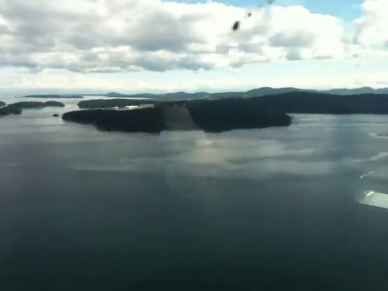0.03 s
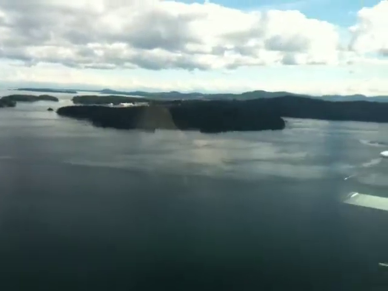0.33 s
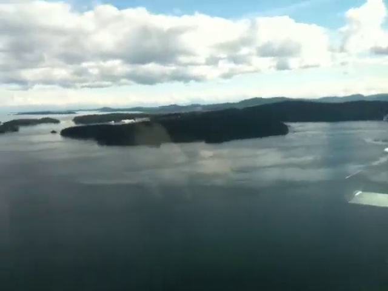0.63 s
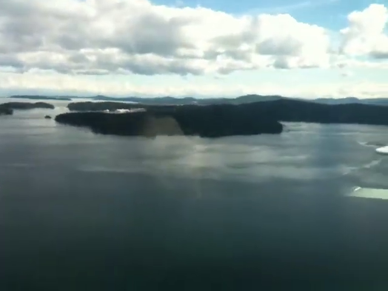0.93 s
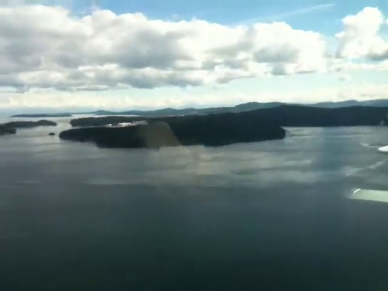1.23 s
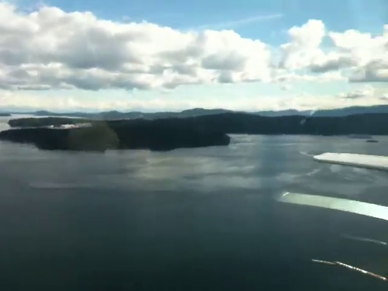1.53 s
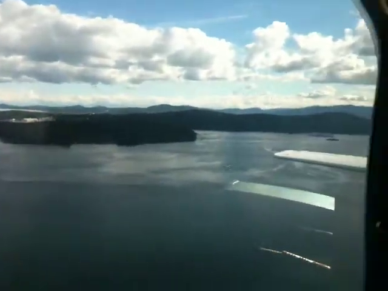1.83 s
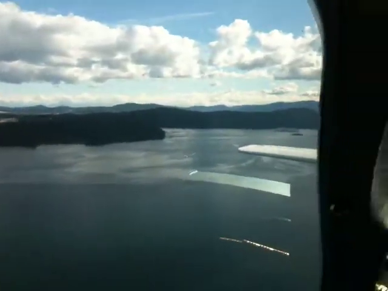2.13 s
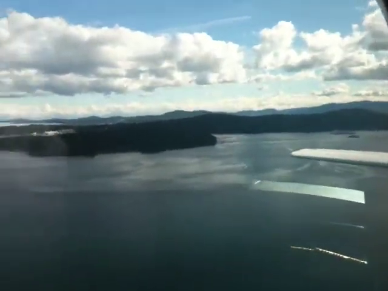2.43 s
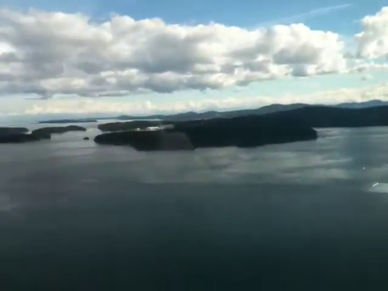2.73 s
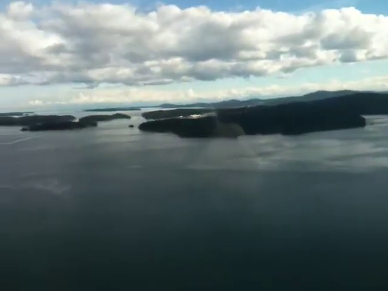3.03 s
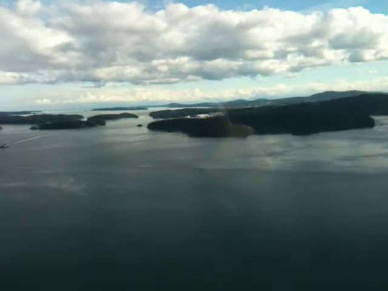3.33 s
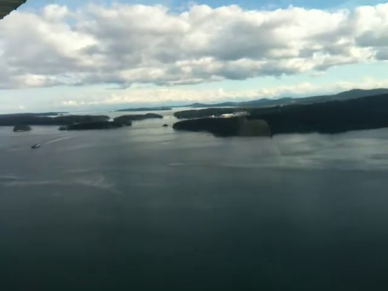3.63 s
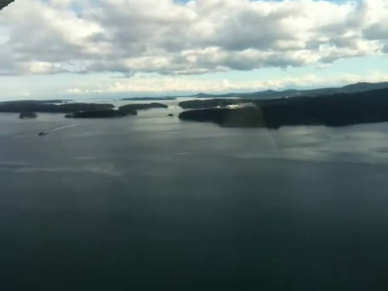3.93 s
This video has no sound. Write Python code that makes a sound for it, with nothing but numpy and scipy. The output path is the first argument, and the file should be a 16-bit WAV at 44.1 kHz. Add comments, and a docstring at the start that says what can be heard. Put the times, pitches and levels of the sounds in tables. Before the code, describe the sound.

A small propeller plane's engine drones loudly and steadily, heard from a passenger seat in flight. The cabin roars low and air hisses past the windows. The microphone overloads slightly, and one sharp click comes near the end.

```python
"""Small piston aircraft cabin in cruise.

Propeller and exhaust drone at multiples of the firing rate, with faint lines between
from unequal cylinders. The cabin roars and booms, a window seal whistles, and air hisses
past the windows, pulsing with the blades. The microphone overloads slightly; one click comes late."""
import sys
import numpy as np
from scipy import signal
from scipy.fft import rfft, irfft
from scipy.io import wavfile

SR = 44100
rng = np.random.default_rng(int(sys.argv[2]) if len(sys.argv) > 2 else 0)


def int16_out(signal):
    """Quantize to a 16-bit WAV file."""
    q = np.round(np.clip(np.atleast_2d(signal).T, -1, 1) * 32767)
    wavfile.write(sys.argv[1], SR, q.astype(np.int16))


N = 176400
TIME = np.arange(N) / SR

# Engine firing rate: time_s, rate_hz
FIRING_RATE = [(0, 83.3), (.4, 83.25), (.7, 83.53), (1.1, 83.57), (1.6, 83.82), (2.2, 83.68), (3.0, 83.65),
               (3.5, 83.33), (4, 83.2)]


def from_db(db):
    """Decibels to gain."""
    return 10 ** (np.asarray(db) / 20)


def curve(rows):
    """Rows of time_s, value interpolated to every sample."""
    return np.interp(TIME, *np.transpose(rows))


def drift(rate_hz):
    """Smooth random wander, zero mean, unit spread."""
    step, settle = 20, 4000
    pole = np.exp(-2 * np.pi * rate_hz * step / SR)
    white = rng.standard_normal(N // step + settle + 2)
    slow = signal.lfilter([1], [1, -2 * pole, pole * pole], white)[settle:]
    return np.interp(np.arange(N) / step, np.arange(len(slow)), (slow - slow.mean()) / slow.std())


def shaped_noise(spectrum):
    """Noise following rows of freq_hz, density_db_per_hz; rolls off above the last row."""
    freq_hz, density_db = np.transpose(spectrum)
    bins_hz = np.maximum(np.arange(N // 2 + 1) * SR / N, 1)
    gain = from_db(np.interp(np.log(bins_hz), np.log(freq_hz), density_db))
    gain /= np.maximum(bins_hz / freq_hz[-1], 1) ** 2
    return irfft(rfft(rng.standard_normal(N)) * gain, N) * np.sqrt(SR / 2)


def resonant_noise(centre_hz, width_hz):
    """Air noise ringing in one resonance, rms 1."""
    radius = np.exp(-np.pi * width_hz / SR)
    feedback = [1, -2 * radius * np.cos(2 * np.pi * centre_hz / SR), radius * radius]
    ringing = signal.lfilter([1, 0, -1], feedback, rng.standard_normal(N))
    return ringing / ringing.std()


def sizzle():
    """Thin, bright hiss that grows late."""
    # Sizzle spectrum: freq_hz, density_db_per_hz
    spectrum = [(4000, -100), (8000, -82), (11000, -84.5), (16000, -97)]
    # Sizzle envelope: time_s, gain_db
    envelope = [(0, -16), (2.3, -10), (3.3, 0), (4, -2)]
    return from_db(curve(envelope)) * shaped_noise(spectrum)


def slipstream(firings):
    """Turbulent hiss past the windows and a seal's breathy whistle, chopped by the propeller wash."""
    # Airflow spectrum: freq_hz, density_db_per_hz
    spectrum = [(400, -79), (1200, -65.5), (1900, -65), (2350, -67.5), (2800, -67), (3700, -70),
                (5200, -71), (7000, -73), (10000, -81.5), (13000, -88), (16000, -96)]
    # Overall airflow envelope: time_s, gain_db
    envelope = [(0, -0.1), (.4, -0.1), (.6, 0.5), (1.6, 0.7), (2.5, 0.5), (3.0, 1.1), (3.4, 0), (3.7, 0.2),
                (4, -0.7)]
    # Window seal whistle: time_s, level_db
    seal_level = [(0, -40), (.7, -39), (1.1, -42), (1.65, -37), (2.2, -41.5), (3.0, -40), (3.6, -39),
                  (3.76, -35), (3.9, -43)]
    # Band of hiss that swells midway: time_s, level_db
    swell_level = [(0, -54), (1.6, -42), (2.2, -38.5), (2.6, -36.5), (3.0, -57), (4, -48)]
    seal_db = curve(seal_level) + 2 * drift(rate_hz=16)
    seal = from_db(seal_db) * resonant_noise(centre_hz=1498, width_hz=65)
    swell = from_db(curve(swell_level)) * resonant_noise(centre_hz=2790, width_hz=560)
    dip_depth, dip_sharpness = 0.59, 118  # brief sag per blade pass, once per firing
    wash = 1 - dip_depth * np.abs(np.cos(np.pi * firings)) ** dip_sharpness
    turbulence_db = 0.7 * drift(rate_hz=36) + 1.44 * drift(rate_hz=228)
    return (shaped_noise(spectrum) + seal + swell) * wash * from_db(curve(envelope) + turbulence_db)


def cabin():
    """Broad roar, the boom of the cabin's air resonance and a mid-range rush."""
    # Roar spectrum: freq_hz, density_db_per_hz
    roar_spectrum = [(20, -81), (58, -72), (100, -55.5), (130, -44.5), (185, -41), (240, -39.5), (310, -44),
                     (420, -47), (560, -50), (720, -55.5), (950, -59), (1300, -69), (2500, -77)]
    # Mid-range rush: time_s, level_db
    rush_level = [(0, -32), (.5, -36), (1.5, -36), (2.3, -48), (3.0, -37), (4, -35)]
    boom = from_db(-27) * resonant_noise(centre_hz=186.5, width_hz=12.4)
    rush = from_db(curve(rush_level)) * resonant_noise(centre_hz=824, width_hz=200)
    return shaped_noise(roar_spectrum) + boom + rush


def engine_tone(firings, order, level_db):
    """One multiple of the firing rate; the cabin delays higher tones more."""
    delay_s_per_hz = 5.5e-5
    pitch_hz = order * np.mean(curve(FIRING_RATE))
    lag_cycles = delay_s_per_hz * pitch_hz ** 2 / 2
    return -np.sqrt(2) * from_db(level_db) * np.cos(2 * np.pi * (order * firings - lag_cycles))


def engine(firings):
    """Wavering propeller and exhaust tones, with weak lines between from unequal cylinders."""
    # Propeller and exhaust tones: firing_order, level_db
    tones = [(1, -36.5), (2, -11.1), (3, -18), (4, -22.5), (5, -23.5), (6, -24.5), (7, -24.5), (8, -36.5),
             (9, -48.5), (10, -39), (11, -45.5), (13, -44)]
    # Unequal-cylinder lines: engine_cycle_order, level_db
    cylinder_lines = [(5, -44), (13, -36), (14, -37), (22, -38), (26, -42), (31, -43), (33, -46), (36, -47)]
    # Slow swelling of the two strongest tones: time_s, second_gain_db, third_gain_db
    swelling = [(0, 0, -1), (.45, -0.5, 0.7), (1.0, 0.3, -0.7), (1.7, -2, 1.5), (2.0, 0.3, 0.5),
                (2.3, -1.3, -1.7), (2.9, 0.1, 0.9), (3.3, -1.5, -2.5), (3.65, .7, -2.5), (4, 0, -2.8)]
    # Buzz, the tones from order 4 up: time_s, gain_db
    buzz = [(0, -1.5), (.1, -2), (.4, -.5), (.8, -0.2), (1.55, 0.3), (1.9, 0), (2.6, -0.5), (3.2, 1),
            (3.45, -1), (3.7, -2), (4, -1.5)]
    cylinders, jitter_s, waver_hz = 4, 6e-5, 4.6
    time_s, second_db, third_db = np.transpose(swelling)
    low_order_db = {1: 0, 2: np.interp(TIME, time_s, second_db), 3: np.interp(TIME, time_s, third_db)}
    buzz_db = curve(buzz)
    uneven_firings = firings + jitter_s * curve(FIRING_RATE) * drift(rate_hz=34.4)
    drone = np.zeros(N)
    for order, level_db in tones:
        waver_db = 0.21 * order ** 0.47 * drift(waver_hz)
        gain_db = low_order_db.get(order, buzz_db)
        drone += engine_tone(uneven_firings, order, level_db + waver_db + gain_db)
    for cycle_order, level_db in cylinder_lines:
        drone += engine_tone(uneven_firings, cycle_order / cylinders, level_db + 2 * drift(waver_hz))
    return drone


def click():
    """One dry, sharp recorder click over a soft, low knock."""
    start_s, tick_decay_s, knock_decay_s = 3.4232, 0.00014, 0.0016
    age_s = np.maximum(TIME - start_s, 0)
    tick = from_db(-1.5) * np.exp(-age_s / tick_decay_s)
    knock = from_db(-18) * age_s / knock_decay_s * np.exp(1 - age_s / knock_decay_s)
    return -(tick + knock) * (TIME >= start_s)


def scene():
    """Cabin, engine and airflow at the passenger's seat, mono."""
    firings = np.cumsum(curve(FIRING_RATE)) / SR  # running count
    return (cabin() + engine(firings) + slipstream(firings) + sizzle())[None]


def record(dry):
    """Microphone overload flattens the tallest peaks; then the click, edge fades and a steep low-pass."""
    ceiling, knee_hardness = 0.73, 11.4
    fade_s, cutoff_hz = 0.004, 15860
    clipped = dry / (1 + np.abs(dry / ceiling) ** knee_hardness) ** (1 / knee_hardness)
    fade = np.clip(np.minimum(TIME, TIME[-1] - TIME) / fade_s, 0, 1)
    lowpass = signal.ellip(12, 0.1, 90, cutoff_hz, fs=SR, output="sos")
    return signal.sosfilt(lowpass, fade * (clipped + click()))


dry = scene()
out = record(dry)
int16_out(out)
```